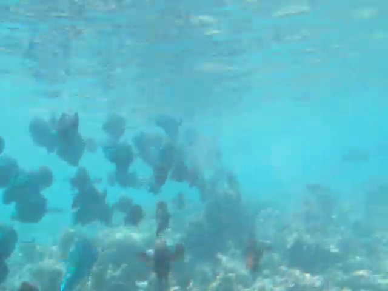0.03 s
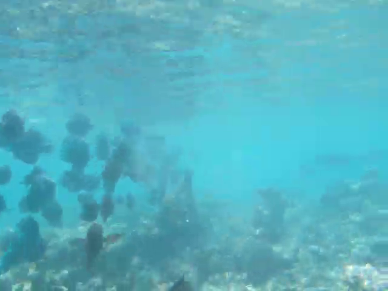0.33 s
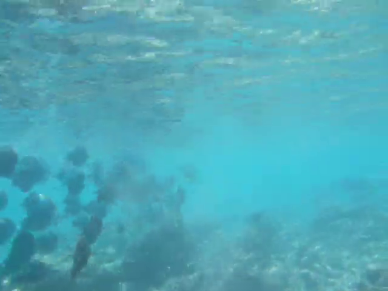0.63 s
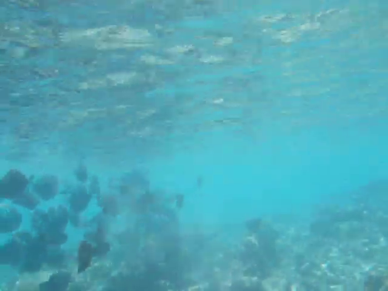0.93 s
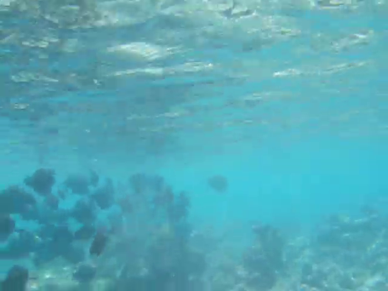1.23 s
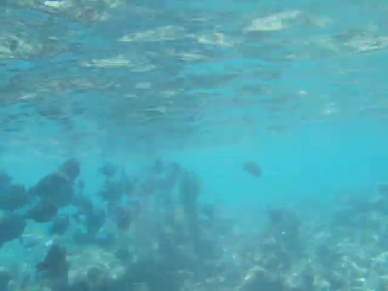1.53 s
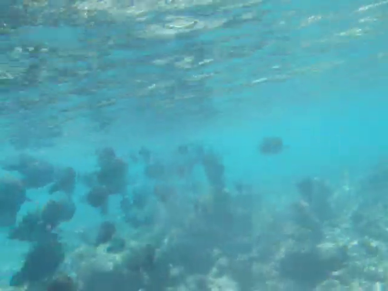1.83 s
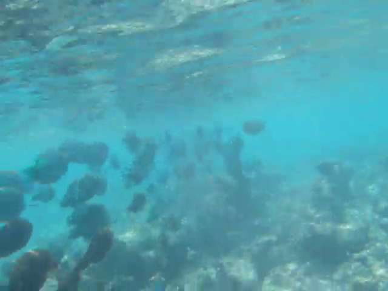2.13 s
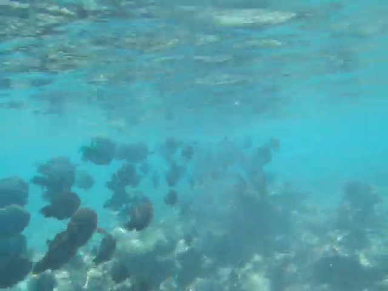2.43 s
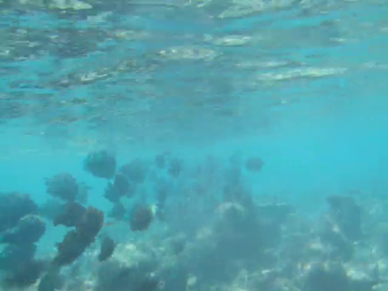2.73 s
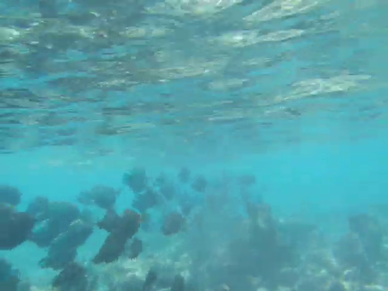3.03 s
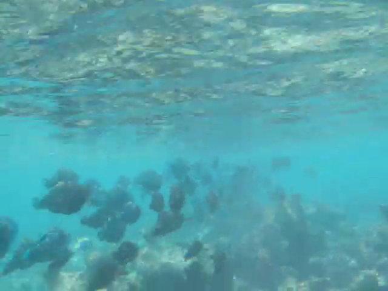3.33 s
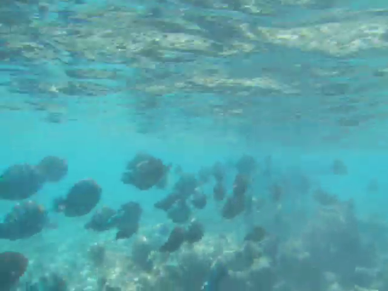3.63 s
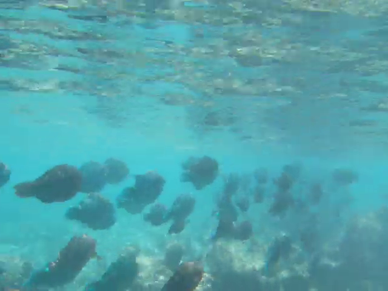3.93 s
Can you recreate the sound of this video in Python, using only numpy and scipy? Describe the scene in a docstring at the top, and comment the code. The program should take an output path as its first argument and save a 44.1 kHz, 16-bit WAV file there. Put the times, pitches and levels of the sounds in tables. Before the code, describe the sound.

Faint underwater crackle from snapping shrimp runs for all four seconds, with a sputtering fizz and low water rumble. The camera housing ticks and rubs in the first 0.2 seconds and again from 0.5 to 0.7. Tiny bubble pops and close snaps are scattered throughout, the sharpest snaps around 2.8 to 3.2 seconds. Soft housing bumps come near 2.4 and 3.8 seconds.

```python
"""Shallow coral reef, underwater.

Snapping shrimp crackle near and far; bubbles pop as damped tones. A drifting camera's
waterproof housing ticks, rubs and bumps in the hand over a slow swell and a low rumble.
The recorder's coarse steps turn the faint background into a sputtering fizz."""
import sys
import numpy as np
from scipy import signal
from scipy.fft import rfft, irfft
from scipy.io import wavfile
from scipy.ndimage import uniform_filter1d

SR = 44100
rng = np.random.default_rng(int(sys.argv[2]) if len(sys.argv) > 2 else 0)


def bounce(signal):
    """Save signal as a 16-bit WAV file at the path given by the first command-line argument."""
    frames = np.transpose(np.atleast_2d(signal))
    limited = np.clip(frames, -1, 1)
    pcm = np.round(limited * 32767).astype(np.int16)
    wavfile.write(sys.argv[1], SR, pcm)


N = 176400
T = np.arange(N) / SR

# near shrimp snaps: t/s, level/dB, f/Hz
NEAR_SNAPS = [(.2785, -48, 2620), (.8478, -45.5, 4630), (0.8905, -42, 3600), (1.0704, -46, 2750),
              (1.2613, -43.5, 6300), (1.297, -46.5, 2360), (1.3266, -42.5, 3480), (1.42, -44.5, 5100),
              (1.6798, -41.5, 4450), (2.092, -41.5, 5750), (2.4277, -44, 5850), (2.4495, -45.5, 5500),
              (2.8241, -35, 5660), (3.0678, -37.5, 4780), (3.1582, -45.5, 5430), (3.1785, -36, 3420),
              (3.4568, -46, 6200), (3.479, -45.5, 6160), (3.782, -43.5, 5900)]
# distant crackle: t/s, level/dB
FAR_LEVEL = [(0, -56), (.75, -56), (1.15, -58.5), (1.55, -56), (1.93, -57), (2.1, -57.5), (2.31, -58),
             (2.5, -57), (2.7, -58.5), (2.96, -56), (3.1, -58), (3.3, -55.5), (3.6, -58), (4, -57.5)]
# its spectrum: f/Hz, level/dB
FAR_SPECTRUM = [(500, -11), (1000, -5.5), (1400, -8), (1650, 0), (1900, 0), (2150, -7.5), (2550, 0.5),
                (2850, -5), (3300, -9.5), (3530, -0.5), (3850, -6.5), (5100, -3), (5450, -5.5), (5950, -1),
                (6500, -4), (7100, -6.5), (7600, 0.5), (8200, -7)]
# crackle flurries: t/s, sigma/s, level/dB
FLURRY_PEAKS = [(0.267, 0.021, -54.5), (0.474, 0.026, -59), (1.005, 0.029, -53), (1.266, 0.016, -53),
                (1.355, 0.021, -51), (1.657, 0.031, -52), (2.062, .018, -51.5), (2.176, 0.036, -52.5),
                (2.44, .025, -52), (2.547, 0.017, -53.5), (2.863, 0.0084, -55), (3.463, .025, -59.5),
                (3.821, 0.021, -59)]
# their spectrum: f/Hz, level/dB
FLURRY_SPECTRUM = [(1400, -9.5), (1750, 1.5), (2150, -6.5), (2550, -1.5), (2900, -8.5), (3550, -1),
                   (4200, -8.5), (5400, -5.5), (6000, 3.5), (6600, -4), (7100, -6.5), (7600, -2.5)]
# bubble pops: t/s, level/dB, f/Hz, decay/cycles
BUBBLE_POPS = [(.2785, -47.5, 2520, 5.6), (.3380, -38, 820, 1.2), (.3388, -40, 1350, 1.9),
               (.4170, -40, 2020, 1.8), (.7738, -41, 1880, 2.5), (.9795, -40, 1610, 3.5),
               (.9865, -46.5, 1640, 3.6), (.992, -41.5, 1610, 2.5), (1.3262, -40.5, 1800, 4.2),
               (1.649, -48, 1850, 2.4), (1.6802, -39, 2650, 3), (2.4905, -35, 2490, 2.3),
               (2.4908, -37, 1764, 2.5), (2.9362, -37.5, 2160, 1.4), (2.9435, -39, 1800, 1.5),
               (2.9622, -39.5, 2136, 2.2), (3.1774, -35.5, 1690, 1.65), (3.801, -41.5, 1730, 2.1),
               (3.815, -42, 2060, 2.2), (3.955, -42.5, 1820, 2.3)]
# small far bubbles: f/Hz, level/dB
PATTER_SPECTRUM = [(1200, -15.5), (1650, 2), (1900, 1.5), (2150, -3.5), (2550, 1), (3000, -9)]
# housing resonances: f/Hz, width/Hz, gain/dB
HOUSING_MODES = [(1715, 190, -6.5), (2494, 200, -8), (3119, 100, -6.5), (3487, 80, 3.5), (3598, 110, 4.5),
                 (4404, 140, -7.5), (4926, 160, -2), (5220, 300, -6.5), (6030, 240, 4), (6253, 130, -6),
                 (6964, 220, -5.5), (7613, 180, 2)]
# housing ticks: t/s, level/dB
HOUSING_TICKS = [(.0087, -48), (.0543, -56), (.0683, -42), (.0764, -37.5), (.0836, -31), (.0885, -48),
                 (.0915, -29), (.0948, -36.5), (.1032, -30), (.1122, -35.5), (.1178, -35.5), (.1207, -37),
                 (.1228, -30), (.1307, -32), (.1381, -43), (.1427, -42.5), (.148, -39), (.1644, -40.5),
                 (.1727, -38.5), (.1797, -31.5), (.5026, -43), (.5406, -53), (.5619, -44), (.6225, -42),
                 (.6526, -46.5), (.6583, -29.5), (.6674, -31), (.6738, -39.5), (.6813, -39)]
# hand rubbing: t/s, level/dB
RUB_LEVEL = [(0, -47.5), (.04, -55.5), (.06, -47.5), (.09, -42), (.125, -40), (.16, -47.5), (.19, -51),
             (.22, -69), (.5, -71), (.55, -45), (.6, -61), (.72, -66)]
# soft housing bumps: t/s, level/dB, f/Hz, decay/cycles
HOUSING_BUMPS = [(.084, -47, 389, 4), (.305, -50.5, 383, 3), (.875, -48.5, 402, 1.5),
                 (2.4315, -38, 245, 0.6), (2.440, -37.5, 331, 0.87), (2.464, -41, 378, 1.3),
                 (2.588, -46, 402, 1.2), (3.799, -43.5, 326, 1), (3.812, -50, 332, 1),
                 (3.96, -45, 360, 2.7)]
# water rumble: t/s, level/dB
RUMBLE_LEVEL = [(0, -56.5), (.35, -58), (.7, -60.5), (1.2, -61.5), (2.2, -62.5), (2.6, -60.5), (3.0, -64.5),
                (3.4, -64), (3.7, -63), (4, -58)]
# its spectrum: f/Hz, level/dB
RUMBLE_SPECTRUM = [(25, 8), (45, 3.5), (65, -4), (120, -2), (200, -3.5), (270, -0.5), (380, 3.5), (480, -4),
                   (700, -7), (1200, -17.5)]
# pressure swell: t/s, level/dB
SWELL_LEVEL = [(0, -44), (.4, -40.5), (1.2, -42), (1.9, -45), (2.7, -44.5), (3.3, -39.5), (4, -42)]
# brief background dips: t/s, half-width/s
LULL_TIMES = [(1.793, .009), (2.312, .005), (2.801, 0.0049), (3.031, 0.011), (3.567, .007)]


def near_shrimp():
    """Single snaps, each with its own brightness, partly coloured by the housing."""
    out = np.zeros(N)
    for t_s, db, hz in NEAR_SNAPS:
        crack = burst(rise_s=.0006, decay_s=.0012, tail_db=-17, tail_s=.0065)
        snap = resonance(crack, hz, width_hz=hz / 2)
        direct = from_db(-1) * resonance(snap, hz, width_hz=hz)
        add(out, t_s, at_level(housing(snap) + direct, db + 1))
    return out


def far_shrimp():
    """Countless distant snaps, the farthest merged into hiss."""
    snaps = grains(per_s=1000, spread_db=3.5)
    hiss = from_db(-2.5) * rng.standard_normal(N)
    flicker_db = 1.68 * drift(rate_hz=25)
    return level(FAR_LEVEL) * from_db(flicker_db) * colour(snaps + hiss, FAR_SPECTRUM)


def flurries():
    """Fine crackle that rises and fades for a moment."""
    envelope = sum(from_db(db) * np.exp(-((T - t_s) / sigma_s) ** 2 / 2)
                   for t_s, sigma_s, db in FLURRY_PEAKS)
    return envelope * colour(grains(per_s=2500, spread_db=2.5), FLURRY_SPECTRUM)


def bubbles():
    """Near bubbles ring, rising slightly in pitch; the coral echoes them."""
    return rings(BUBBLE_POPS, glide=.015, echo_db=-14, echo_s=.014)


def handling():
    """The hand ticks and rubs on the housing."""
    out = level(RUB_LEVEL) * rms_one(housing(grains(per_s=4000, spread_db=1.8)))
    for t_s, db in HOUSING_TICKS:
        tick = burst(rise_s=.0007, decay_s=.0009, tail_db=-27.5, tail_s=.005)
        add(out, t_s, at_level(housing(tick), db - .4))
    return out


def bumps():
    """Soft knocks on the housing: low, quickly damped tones."""
    return rings(HOUSING_BUMPS, glide=0, echo_db=-17.5, echo_s=.014)


def housing(x):
    """The plastic shell: a broad direct path plus narrow modes."""
    direct = from_db(-13) * resonance(x, hz=5500, width_hz=6000)
    return direct + sum(from_db(db) * resonance(x, hz, width_hz) for hz, width_hz, db in HOUSING_MODES)


def patter():
    """Small bubbles bursting all over the reef."""
    return from_db(-65) * colour(grains(per_s=160, spread_db=2), PATTER_SPECTRUM)


def water(lull_gain):
    """Low rumble over a pressure swell; in a lull the rumble dips and the swell slows."""
    flicker = from_db(drift(rate_hz=10))
    rumble = level(RUMBLE_LEVEL) * flicker * colour(rng.standard_normal(N), RUMBLE_SPECTRUM)
    swell_band_hz = [4, 11]
    bandpass = signal.butter(2, swell_band_hz, "band", fs=SR, output="sos")
    swell = rms_one(signal.sosfilt(bandpass, rng.standard_normal(N + SR))[SR:])
    slowed_s = np.cumsum(lull_gain) / SR
    return lull_gain * rumble + level(SWELL_LEVEL) * np.interp(slowed_s, T, swell)


def burst(rise_s, decay_s, tail_db, tail_s):
    """A crack: fast-decaying noise with a faint tail of reflections."""
    t = T[:SR // 25]
    after_s = np.maximum(t - rise_s, 0)
    decay = np.exp(-after_s / decay_s) + from_db(tail_db) * np.exp(-after_s / tail_s)
    envelope = np.minimum(t / rise_s, 1) * decay
    crack = envelope * rng.standard_normal(len(t))
    for _ in range(3):  # flatten the spectrum, restore the envelope
        white = irfft(np.exp(1j * np.angle(rfft(crack))), len(t))
        local_rms = np.sqrt(np.abs(uniform_filter1d(white ** 2, size=24)) + 1e-12)
        crack = envelope * white / local_rms
    return crack


def rings(rows, glide, echo_db, echo_s):
    """Damped tones with a fractional pitch glide and scattered echoes."""
    out, t = np.zeros(N), T[:SR // 20]
    for t_s, db, hz, cycles in rows:
        age = t * hz / cycles
        pitch_hz = hz * (1 + glide * np.tanh(age - 1))
        tone = 2 * np.sin(2 * np.pi * np.cumsum(pitch_hz) / SR) * np.exp(-age)
        scatter = rms_one(resonance(rng.standard_normal(len(t)), hz, width_hz=hz / 2))
        echoes = from_db(echo_db) * scatter * np.exp(-t / echo_s)
        attack = 1 - np.exp(-3 * age)
        add(out, t_s, from_db(db) * (tone + echoes) * attack)
    return out


def grains(per_s, spread_db):
    """Random clicks, many small and few large; rms 1."""
    sizes = from_db(spread_db * np.minimum(rng.exponential(1, N), 5))
    signs = rng.choice([-1, 1], N)
    return rms_one(sizes * signs * (rng.random(N) < per_s / SR))


def drift(rate_hz):
    """Slow random wander; rms 1."""
    hop, settle = 40, 2000
    r = np.exp(-2 * np.pi * hop * rate_hz / SR)
    noise = rng.standard_normal(N // hop + settle + 2)
    slow = signal.lfilter([1], [1, -2 * r, r * r], noise)[settle:]
    return np.interp(np.arange(N) / hop, np.arange(len(slow)), rms_one(slow))


def colour(x, spectrum):
    """Shape by (f/Hz, level/dB) rows, 12 dB/octave down past both ends; rms 1."""
    hz, db = np.transpose(spectrum)
    f = np.maximum(np.arange(N // 2 + 1) * SR / N, 1)
    rolloff = np.minimum(f / hz[0], 1) ** 2 * np.minimum(hz[-1] / f, 1) ** 2
    gain = from_db(np.interp(np.log(f), np.log(hz), db))
    return rms_one(irfft(rfft(x) * rolloff * gain, N))


def resonance(x, hz, width_hz):
    """Two-pole resonator; peak gain 1."""
    r = np.exp(-np.pi * width_hz / SR)
    b = np.array([1, 0, -1]) * (1 - r * r) / 2
    a = [1, -2 * r * np.cos(2 * np.pi * hz / SR), r * r]
    return signal.lfilter(b, a, x + 1e-18)


def from_db(db):
    """Decibels to gain."""
    return 10 ** (np.asarray(db) / 20)


def rms_one(x):
    """Scale to rms 1."""
    return x / np.sqrt(np.mean(x ** 2) + 1e-20)


def level(rows):
    """Gain over time from (t/s, level/dB) rows."""
    return from_db(np.interp(T, *np.transpose(rows)))


def at_level(sound, db):
    """Scale to the energy of 2 ms at this level."""
    return from_db(db) * sound / np.sqrt(np.sum(sound ** 2) / (.002 * SR))


def add(out, t_s, sound):
    """Mix a sound in at t_s."""
    i = max(int(t_s * SR), 0)
    out[i:i + len(sound)] += sound[:N - i]


def scene():
    """Near events over reef and water, which dip briefly in the lulls; mono."""
    lull_db = -6 * sum(np.exp(-((T - t_s) / half_s) ** 2) for t_s, half_s in LULL_TIMES)
    lull_gain = from_db(lull_db)
    near = handling() + near_shrimp() + bubbles() + bumps()
    far = far_shrimp() + flurries() + patter()
    return (near + lull_gain * far + water(lull_gain))[None]


def record(dry):
    """Recorder: low sample rate, coarse quantising, low-pass."""
    rate_hz, step_db, cutoff_hz = 16000, -45.1, 9700
    step = from_db(step_db)
    sampled = signal.resample(dry, N * rate_hz // SR, axis=1)
    stepped = step * np.round(sampled / step)
    out = signal.resample_poly(stepped, SR, rate_hz, axis=1)[:, :N]
    return signal.sosfilt(signal.cheby2(16, 60, cutoff_hz, fs=SR, output="sos"), out)


dry = scene()
out = record(dry)
bounce(out)
```